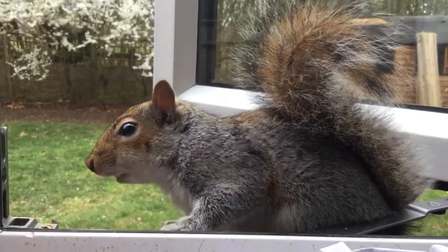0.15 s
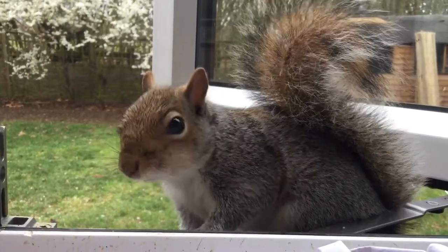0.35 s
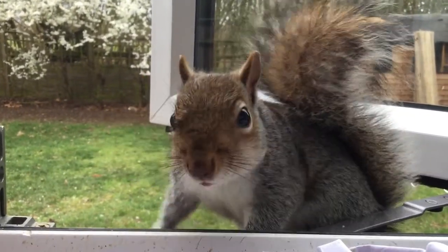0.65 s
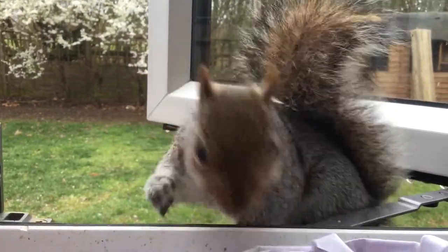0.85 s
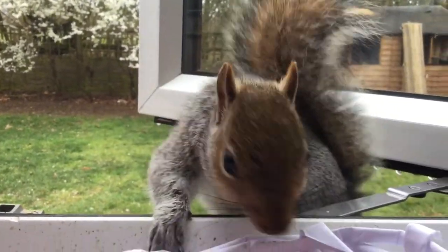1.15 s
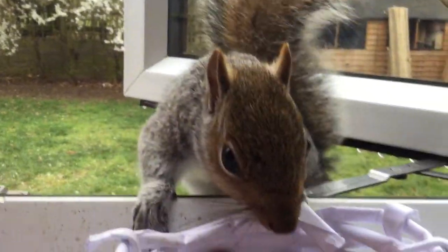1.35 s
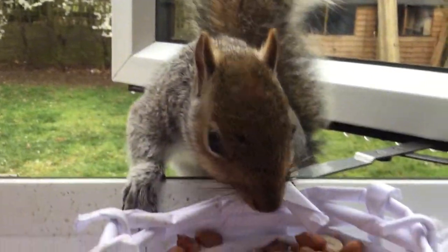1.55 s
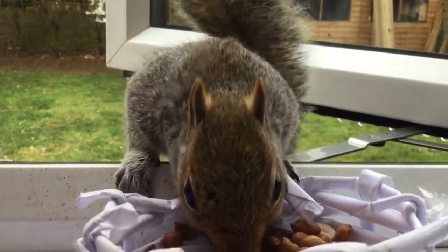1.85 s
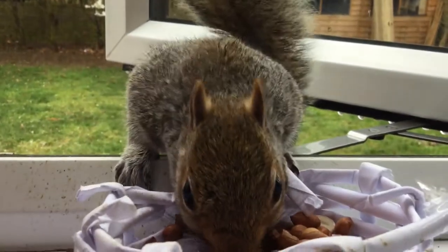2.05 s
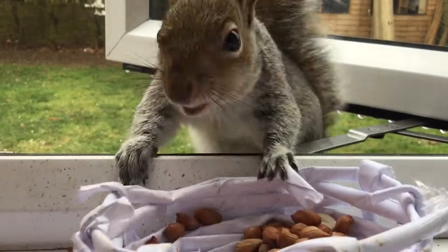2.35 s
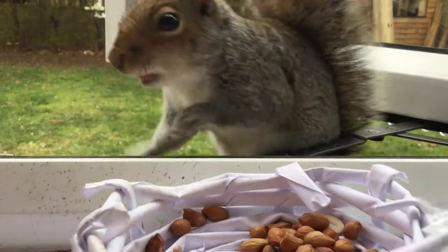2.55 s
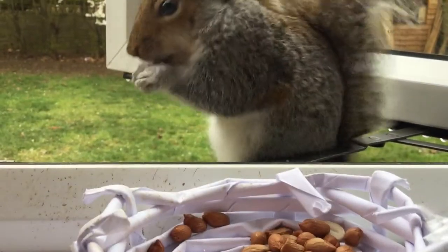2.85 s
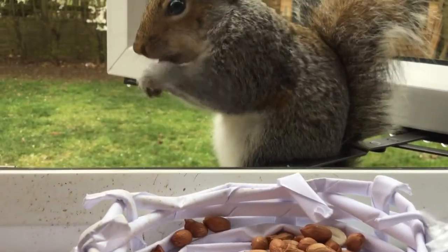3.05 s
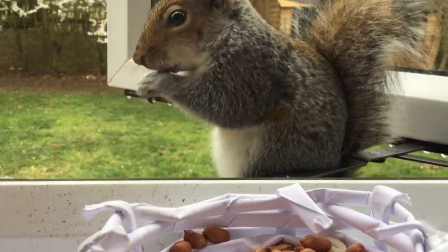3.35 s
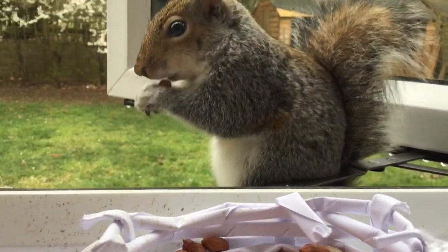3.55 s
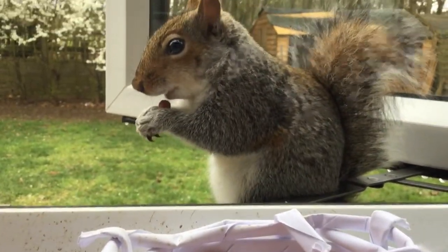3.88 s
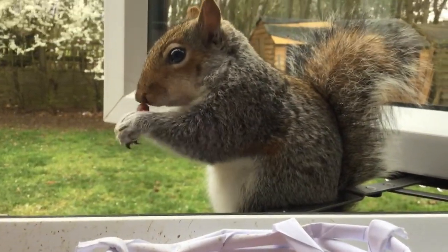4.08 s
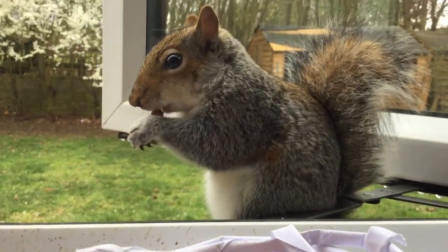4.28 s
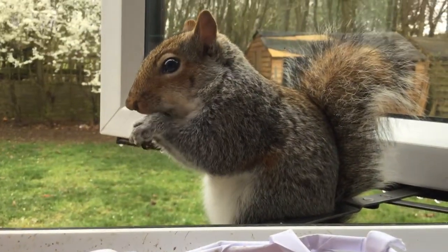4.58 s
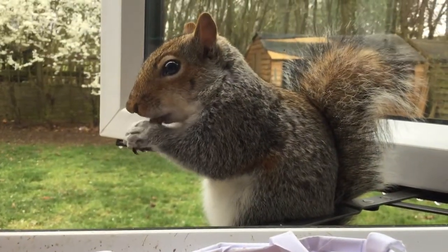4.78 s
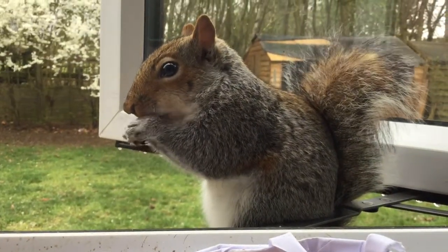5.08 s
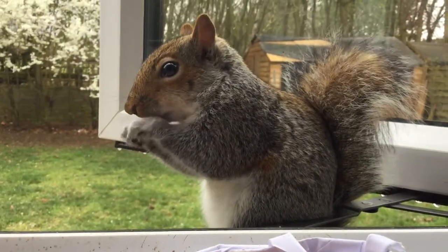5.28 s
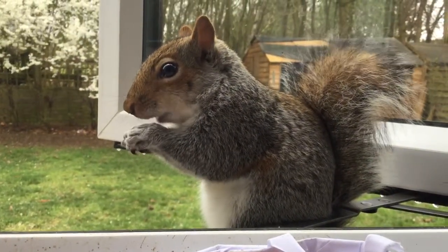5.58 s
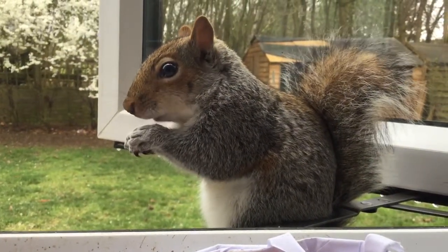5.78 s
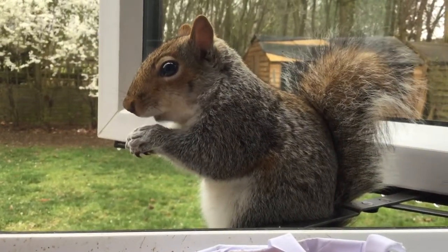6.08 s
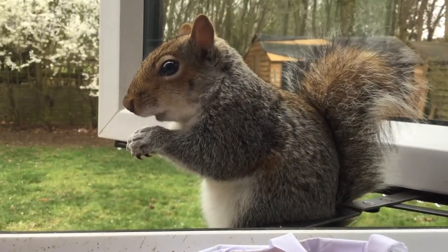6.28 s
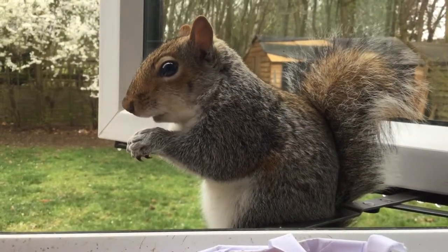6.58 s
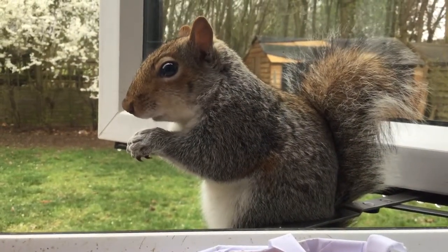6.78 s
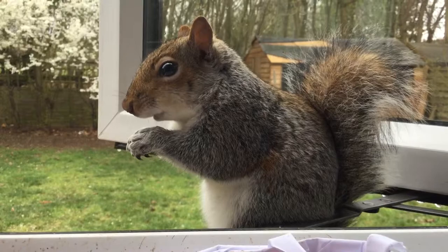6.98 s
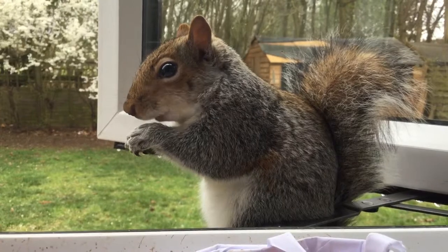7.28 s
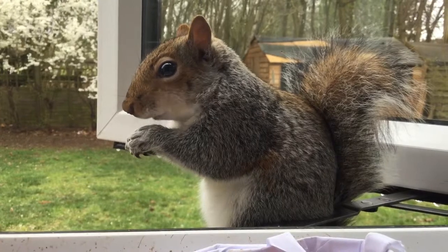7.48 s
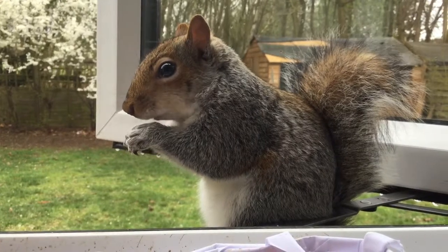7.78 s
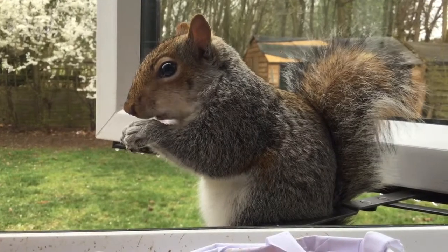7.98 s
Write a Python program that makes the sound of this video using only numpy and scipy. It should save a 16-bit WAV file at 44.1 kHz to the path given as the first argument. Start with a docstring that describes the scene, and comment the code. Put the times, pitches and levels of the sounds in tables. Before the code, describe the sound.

At an open window beside a quiet garden, dull knocks and a dry rattle of nuts come first, with a bird whistling outside. After a short lull and tiny metallic ticks, close crisp gnawing begins: irregular small snaps and scrapes, two bright hard cracks, then gentler nibbling. Faint traffic rumble runs throughout, a distant saw screeches briefly, and the bird sings again near the end.

```python
"""A squirrel gnaws a nut close to the microphone: its teeth scrape and snap, and twice the nut cracks sharply.
Before that its paws brush and knock on a window sill and a basket of nuts; claws tick lightly on metal.
Bites and touches are noise bursts and clouds of tiny slips that ring broad resonances.
Through the open window come distant traffic and hum (shaped noise, tones), a far whine like a saw,
birdsong (gliding tones) with a faint high haze, faint distant notes and a few puffs of wind on the microphone."""
import sys
import numpy as np
from scipy import signal
from scipy.fft import rfft, irfft
from scipy.io import wavfile
from scipy.ndimage import uniform_filter1d

SR = 44100
rng = np.random.default_rng(int(sys.argv[2]) if len(sys.argv) > 2 else 0)


def wav_out(sig):
    """Save sig, one row per channel (or a flat mono array), as 16-bit PCM at SR to the path in sys.argv[1]."""
    wavfile.write(sys.argv[1], SR, np.round(np.clip(np.atleast_2d(sig).T, -1, 1) * 32767).astype(np.int16))


N = 358971
TIME = np.arange(N) / SR
# Levels in the tables are in dB, relative within their layer: each layer is trimmed as it joins the mix.


def amp(db):
    """Decibels to gain."""
    return 10 ** (np.asarray(db) / 20)


def unit(x):
    """Scales to rms 1."""
    return x / np.sqrt(np.mean(x ** 2) + 1e-20)


def curves(rows):
    """Each column of a timed table, sample by sample."""
    s, *columns = np.transpose(rows)
    return [np.interp(TIME, s, c) for c in columns]


def add(mix, s, sound):
    """Mixes a sound in at time s."""
    part = mix[max(round(s * SR), 0):][:len(sound)]
    part += sound[:len(part)]


def coloured(x, points):
    """Gives x a spectrum drawn on a log-frequency axis."""
    hz, db = np.transpose(points)
    log_hz = np.log(np.fft.rfftfreq(len(x), 1 / SR) + 1)
    return irfft(rfft(x) * amp(np.interp(log_hz, np.log(hz), db)), len(x))


def band(x, lo_hz, hi_hz, order=3):
    """A broad causal resonance."""
    edges = np.clip([lo_hz, max(hi_hz, lo_hz * 1.05)], 10, SR * .49)
    return signal.sosfilt(signal.butter(order, edges, "bandpass", fs=SR, output="sos"), x)


def wander(size, hz):
    """Smooth chance of rms 1 that changes about hz times a second."""
    at = np.arange(size) * hz / SR
    knots = rng.standard_normal(size + 2)
    return unit(np.interp(at, np.arange(size + 2), knots))


def blur(size, hz):
    """Complex chance that spreads a carrier into a narrow band of noise."""
    return wander(size, hz) + 1j * wander(size, hz)


def patchy(x, depth_db, from_hz, size=5):
    """Lets patches of the spectrum above from_hz, size bins wide, swell and fade independently."""
    hz, _, z = signal.stft(x, SR, nperseg=2048, noverlap=1536)
    patches = rng.standard_normal(z.shape)
    for _ in range(2):
        across_pitch = uniform_filter1d(patches, size=size, axis=0)
        patches = uniform_filter1d(across_pitch, size=6, axis=1)
    depth = depth_db * np.clip(hz / from_hz - 1, 0, 1)[:, None]
    return signal.istft(z * amp(depth * unit(patches)), SR, nperseg=2048, noverlap=1536)[1][:N]


def echoes(x, t60, delay):
    """Diffuse reflections that die away by 60 dB in t60 seconds."""
    t = np.arange(SR) / SR
    tail = rng.standard_normal(SR) * amp(-60 * t / t60) * (t > delay)
    return signal.fftconvolve(x, tail / np.linalg.norm(tail))[:N]


def reflections(x, first_s, last_s, count):
    """Single echoes from fences, sheds and trees, the later ones weaker; together they make a note flutter."""
    delays = np.geomspace(first_s, last_s, count) * rng.uniform(.85, 1.15, count)
    gains = rng.choice([-1, 1], count) * delays ** -.35
    out = np.zeros(N)
    for delay, gain in zip(delays, gains / np.linalg.norm(gains)):
        add(out, delay, gain * x)
    return out


CONTACT_WIDTH_HZ, CONTACT_DB = 500, 3


def ring(drives, body, levels_db, size):
    """Rings a body with drives (resonances x events x samples); levels are rms over size samples.
    Every point of contact favours its own narrow mode within each broad resonance."""
    out = 0
    for drive, (lo_hz, hi_hz), db in zip(drives, body, levels_db):
        contact_hz = np.clip(rng.uniform(lo_hz, hi_hz, len(drive)), 500, SR * .45)
        contact = [signal.lfilter(*signal.iirpeak(hz, hz / CONTACT_WIDTH_HZ, fs=SR), d)
                   for hz, d in zip(contact_hz, drive)]
        mode = band(drive + amp(CONTACT_DB) * np.array(contact), lo_hz, hi_hz, order=4)
        to_level = np.sqrt(size / (mode ** 2).sum(-1, keepdims=True))
        out = out + mode * amp(db)[:, None] * to_level
    return out


def clicks(rows, body, sharp, after, after_s):
    """Each fracture or blow is a sudden burst, followed by a weaker shiver of what it strikes."""
    s, decay, *levels_db = np.transpose(rows)
    t, out = np.arange(1024) / SR, np.zeros(N)
    # the burst dies away in sharp times its listed decay
    burst = np.exp(-t / np.maximum(sharp * decay[:, None], 1e-4))
    envelope = burst + after * np.exp(-t / after_s)
    drives = rng.standard_normal((len(s), len(body), len(t))).swapaxes(0, 1) * envelope
    for start, sound in zip(s, ring(drives, body, levels_db, .004 * SR)):
        add(out, start, sound)
    return out


SLIP_REACH = .6  # chance that a slip excites a given resonance
STROKE_RISE = 2.11  # time scale of a stroke's rise over that of its fading


def scrapes(rows, body, slips_per_s, spread_db, smooth):
    """A stroke is a swelling, then fading cloud of tiny slips, each of its own size and colour."""
    s, length, *levels_db = np.transpose(rows)
    t, out = (np.arange(8192) - 4096) / SR, np.zeros(N)
    shape = (len(body), len(s), len(t))
    struck = (rng.random(shape[1:]) < slips_per_s / SR) & (rng.random(shape) < SLIP_REACH)
    slips = struck * amp(spread_db * np.minimum(rng.exponential(1, shape), 2.5))
    grit = smooth + signal.lfilter([1], [1, -np.exp(-1 / (.0005 * SR))], slips)  # slips fade over 0.5 ms
    u = t / np.maximum(0.3 * length[:, None], 1e-3)
    stroke = np.where(t < 0, np.exp(-(u / STROKE_RISE) ** 2), 1 / np.cosh(u))
    drives = rng.standard_normal(shape) * grit * stroke * signal.windows.tukey(len(t))
    for start, sound in zip(s + t[0], ring(drives, body, levels_db, length[:, None] * SR)):
        add(out, start, sound)
    return out


def voicing(colour, bright_db, boost_db):
    """Level of each resonance, stroke by stroke: brightness tilts them, and some stand out."""
    base_db, tilt, boosted = np.transpose(colour)
    return base_db + bright_db[:, None] * tilt + boost_db[:, None] * boosted


def splinters(blows, length, weaker_db, scatter_db, spread, count):
    """Weaker copies of each blow, scattered after it on the scale of its stroke."""
    rows = np.repeat(blows, count, axis=0)
    chance = rng.standard_normal(rows.shape)
    rows[:, 0] += spread * np.repeat(length, count) * abs(chance[:, 0])
    rows[:, 2:] += weaker_db + scatter_db * chance[:, 2:]
    return rows


# Spectrum of the distant traffic. Each row: frequency in Hz, relative density in dB.
TRAFFIC_COLOUR = [(20, -41.5), (40, -36), (60, -23), (90, -11), (125, -6), (160, 0.5), (200, 1), (295, 1),
                  (375, -4.5), (440, -7), (500, -5.5), (545, -7.5), (610, -5), (690, -8), (980, -12),
                  (1060, -14.5), (1270, -14.5), (1480, -20), (1750, -24), (1900, -32), (2100, -49),
                  (2500, -70), (4000, -75)]
# Its drift. Each row: time in seconds, level of the rumble in dB, level of the tyre roar in dB.
TRAFFIC_LEVEL = [(0, -56, -60), (2.6, -56.5, -59.5), (3.3, -57.5, -60.5), (4.6, -56, -60.5),
                 (6.4, -58, -61.5), (8.14, -56, -61.5)]


def traffic():
    """Low rumble and dull tyre roar, each drifting."""
    rumble_db, roar_db = curves(TRAFFIC_LEVEL)
    noise = coloured(rng.standard_normal(N), TRAFFIC_COLOUR)
    rumble = signal.sosfiltfilt(signal.butter(4, 500, fs=SR, output="sos"), noise)
    roar = patchy(noise - rumble, depth_db=6, from_hz=1120, size=2)
    low = unit(rumble) * amp(rumble_db + 1.2 * wander(N, 16))
    return low + unit(roar) * amp(roar_db)


# Spectrum of the echoing haze of the birdsong. Each row: frequency in Hz, relative density in dB.
HAZE_COLOUR = [(1500, -5), (2400, -5), (3200, -1), (4500, -4), (7000, -8), (12000, -12), (16000, -16)]
# Its drift. Each row: time in seconds, level in dB.
HAZE_LEVEL = [(0, -88), (.8, -85), (1.3, -76), (1.5, -91), (2.2, -83.5), (3.1, -91), (5.2, -87),
              (5.9, -89.5), (6.3, -91), (7.3, -88), (8.14, -90.5)]


def haze():
    """Faint high hiss, an echoing haze of the birdsong, made of noise whose spectrum is patchy."""
    hiss = patchy(coloured(rng.standard_normal(N), HAZE_COLOUR), depth_db=6.5, from_hz=1000)
    return unit(hiss) * amp(curves(HAZE_LEVEL)[0])


# Tones of distant machinery. Each row: frequency in Hz, level in dB.
HUM_TONES = [(157, -68), (297, -66.5), (495, -72), (615, -74.5), (985, -73.5)]
HUM_WAVER = .012  # rms share of the pitch


def hum():
    """Faint, unsteady tones of distant machinery within the traffic."""
    out = np.zeros(N)
    for hz, db in HUM_TONES:
        turns = np.cumsum(hz * (1 + HUM_WAVER * wander(N, 25))) / SR
        out += amp(db + 3 * wander(N, 6)) * np.sin(2 * np.pi * turns)
    return out


# Pitch of the far saw. Each row: time in seconds, fundamental in Hz.
SAW_PITCH = [(3.75, 451.5), (3.85, 449.5), (4.0, 443.5), (4.2, 431), (4.55, 434.5), (4.7, 426.5),
             (4.9, 430)]
# Level of its whine. Each row: time in seconds, level in dB.
SAW_LEVEL = [(3.74, -100), (3.77, -55), (3.87, -55.5), (3.92, -62), (4.3, -65), (4.62, -64), (4.8, -64.5),
             (4.92, -85), (5.1, -100)]
# Partials of its whine. Each row: multiple of the fundamental, level in dB.
SAW_PARTIALS = [(2.95, -4), (4, -12), (5, 0), (5.92, -8), (6.59, -9)]
# Its rasp in the cut. Each row: time in seconds, level in dB, centre in Hz.
SAW_RASP = [(3.745, -100, 2964), (3.765, -48.5, 2843), (3.875, -53.5, 2673), (3.905, -73, 2740),
            (4.25, -79.5, 2750), (4.55, -65.5, 2863), (4.75, -58, 2990), (5.05, -60, 3180),
            (5.3, -63, 3070), (5.4, -80, 3040), (5.7, -104, 2970)]
# Strands in which the blade rings. Each row: ratio to the rasp's centre, level in dB.
SAW_STRANDS = [(.77, -13), (.9, -6), (.955, -2), (1.0, -2), (1.065, -3), (1.15, -10), (1.42, -19),
               (1.6, -21)]
STRAND_WIDTH_HZ, STRAND_WAVER, STRAND_FLUTTER_DB = 130, .014, 4.5
RASP_WIDTH_HZ, RASP_BROAD_DB = 650, 3


def saw():
    """A whine that sags under load, blurred by the distance; in the cut the blade screeches
    in wavering strands over a rough rasp."""
    (hz,), (whine_db,), (rasp_db, rasp_hz) = curves(SAW_PITCH), curves(SAW_LEVEL), curves(SAW_RASP)
    turns = np.cumsum(hz * (1 + 0.003 * wander(N, 40) + 0.008 * wander(N, 400))) / SR
    whine = sum(amp(level + 4.4 * wander(N, 30)) * np.sin(2 * np.pi * k * turns)
                for k, level in SAW_PARTIALS)
    broad = (blur(N, RASP_WIDTH_HZ) * np.exp(2j * np.pi * np.cumsum(rasp_hz) / SR)).real
    rasp = amp(RASP_BROAD_DB) * band(broad, 2400, 3550)
    for ratio, level in SAW_STRANDS:
        strand_hz = ratio * rasp_hz * (1 + STRAND_WAVER * wander(N, 14))
        strand = np.exp(2j * np.pi * np.cumsum(strand_hz) / SR) * blur(N, STRAND_WIDTH_HZ)
        rasp = rasp + amp(level + STRAND_FLUTTER_DB * wander(N, 18)) * strand.real
    whine = amp(whine_db) * whine
    rasp = amp(rasp_db) * unit(rasp * amp(2.5 * wander(N, 120)))
    direct = amp(-1.5) * whine + amp(-2.0) * rasp
    return direct + echoes(direct, t60=0.091, delay=0.001) + amp(-14) * echoes(rasp, t60=0.44, delay=0.021)


# Faint distant notes and narrow noise bands, from birds, the saw or chewing.
# Each row: start in seconds, length in seconds, pitch in Hz, width of the blur in Hz, level in dB.
FAINT_NOTES = [(0.14, 0.27, 2390, 193, -70.5), (0.326, 0.17, 2300, 262, -78), (0.166, 0.21, 3220, 505, -81),
               (0.362, 0.15, 3360, 300, -72), (0.899, 0.034, 3250, 506, -74), (0.968, .16, 4180, 254, -82),
               (1.162, 0.021, 3650, 300, -66), (1.19, 0.19, 3130, 403, -68), (1.204, 0.05, 3900, 350, -72),
               (2.134, 0.29, 4400, 353, -86), (2.359, 0.29, 4300, 526, -78), (2.598, 0.44, 4330, 154, -87),
               (2.695, 0.1, 2220, 194, -79), (3.965, 0.039, 2900, 120, -74), (4.737, 0.097, 1353, 203, -67),
               (4.931, 0.12, 5270, 300, -91), (4.978, 0.15, 3270, 233, -68),
               (5.412, 0.13, 2600, 604, -80.5), (5.546, 0.53, 2810, 442, -90),
               (6.548, 0.33, 2980, 711, -87.5), (7.19, 0.39, 6970, 690, -85.5), (7.249, .4, 2900, 603, -99),
               (7.659, 0.14, 5200, 206, -86), (7.846, 0.11, 3130, 600, -83),
               (8.077, 0.061, 3210, 400, -74.5)]
FLUTTER_HZ, FLUTTER_DB = 45, 4.5


def faint_notes():
    """Faint notes and noises from birds, the saw or chewing: narrow bands that flutter and break up."""
    out = np.zeros(N)
    for s, length, hz, width, db in FAINT_NOTES:
        size = max(int(length * SR), 64)
        fluttering = blur(size, width) * amp(FLUTTER_DB * wander(size, FLUTTER_HZ))
        note = (fluttering * np.exp(2j * np.pi * hz * np.arange(size) / SR)).real
        add(out, s, amp(db) * unit(note * signal.windows.tukey(size, .5)))
    return out


# The songbird's syllables, and the echoing tail of a whistle. Each: length in seconds,
# start and end pitch as ratios of the middle, buzz in Hz (twice the rms of its random shake in pitch).
RISE = (.045, .86, 1.1, 120)
SLUR = (.08, 1.12, .975, 90)
TAIL = (.11, 1, 1, 110)
BUZZ = (.065, 1.06, .93, 520)
SWEEP = (0.093, 1, 0.63, 1600)
DROP = (.03, 1.2, .8, 200)
CHIP = (.055, 1.05, .96, 260)
# When it sings them. Each row: start in seconds, middle pitch in Hz, level in dB.
RISES = [(.128, 3620, -60.5), (.196, 4580, -63.5), (.97, 3530, -73), (4.816, 4190, -72.5),
         (5.35, 5610, -73), (5.492, 3210, -71), (5.958, 3490, -72), (6.04, 3350, -82), (6.421, 3570, -64),
         (6.49, 4660, -69), (7.158, 3925, -61.5), (7.405, 3820, -65.5)]
SWEEPS = [(1.555, 6850, -66), (7.745, 7230, -71)]
DROPS = [(7.812, 5170, -65)]
CHIPS = [(1.43, 2790, -74), (1.615, 5200, -66), (1.781, 4390, -62), (1.94, 6100, -63.5), (2.385, 5000, -87),
         (3.77, 5280, -75), (4.285, 5080, -80.5), (4.916, 4350, -76.5), (7.839, 3340, -74.5),
         (8.015, 6800, -71.5)]
# A slurred whistle, then its steady echoing tail.
# Each row: start in seconds, middle pitch of the whistle in Hz, its level in dB.
WHISTLES = [(1.055, 5060, -58.5), (1.29, 4995, -58.5), (7.246, 5074, -54.5), (7.487, 4996, -59)]
TAIL_AFTER_S, TAIL_RATIO, TAIL_DB = .055, .975, -7  # tail relative to its whistle
# Five even buzzes lead up to the whistles. Each row: start in seconds, level in dB.
TRILLS = [(0.467, -76), (6.671, -73)]
TRILL_HZ, TRILL_STEP_S = 5400, .095


def trill(s, db, count):
    """Evenly spaced buzzes on one middle pitch."""
    return [(s + k * TRILL_STEP_S, TRILL_HZ, db) for k in range(count)]


def syllables():
    """Every note of the song, and every whistle's tail, with its shape."""
    tails = [(s + TAIL_AFTER_S, hz * TAIL_RATIO, db + TAIL_DB) for s, hz, db in WHISTLES]
    buzzes = [note for s, db in TRILLS for note in trill(s, db, count=5)]
    kinds = [(RISES, RISE), (WHISTLES, SLUR), (tails, TAIL), (buzzes, BUZZ),
             (SWEEPS, SWEEP), (DROPS, DROP), (CHIPS, CHIP)]
    return [(*note, *shape) for notes, shape in kinds for note in notes]


# pulsing of a buzzy syllable: mean rate, depth, and the buzz from which it is fully deep
PULSE_HZ, PULSE_DB, FULL_BUZZ_HZ = 62, 8, 520


def songbird():
    """Whistles glide slightly faster at first; buzzy syllables shake in pitch and pulse in level."""
    out = np.zeros(N)
    for s, middle_hz, db, length, start, end, buzz_hz in syllables():
        u = np.linspace(0, 1, max(int(length * SR), 64))
        size = len(u)
        glide = middle_hz * np.polyval(np.polyfit([0, .5, 1], [start, 1, end], 2), u ** 0.91)
        pulse_turns = np.cumsum(PULSE_HZ * (1 + .2 * wander(size, 60))) / SR
        pulse = np.sin(2 * np.pi * pulse_turns) * min(buzz_hz / FULL_BUZZ_HZ, 1)
        hz = glide + .5 * buzz_hz * (wander(size, 700) + pulse)
        swell = signal.windows.tukey(size, .6) * amp(4 * wander(size, 170) + PULSE_DB * pulse)
        add(out, s, amp(db) * unit(swell * np.sin(2 * np.pi * np.cumsum(hz) / SR)))
    return out


# Wind on the microphone. Each row: centre in seconds, length in seconds, level in dB.
PUFFS = [(3.57, 0.02, -53), (5.45, 0.072, -57), (5.512, 0.042, -50), (5.574, 0.017, -49), (6.0, 0.088, -63),
         (6.171, 0.045, -58), (6.229, 0.017, -37), (6.252, 0.025, -44), (6.575, 0.045, -52.5),
         (6.649, 0.044, -54), (7.63, 0.0098, -40.5), (7.7, 0.048, -59)]
# Colour of an eddy that lasts PUFF_SPAN_S. Each row: frequency in Hz, level in dB.
PUFF_COLOUR = [(20, -66), (50, -22), (90, -5.5), (160, 4.5), (240, -6), (350, -18), (700, -56)]
PUFF_SPAN_S, PUFF_DEEPENING = .029, .21  # the second is the power by which length lowers the colour


def wind():
    """Short eddies thump the microphone; the longer the eddy, the deeper it sounds."""
    t, out = (np.arange(16384) - 8192) / SR, np.zeros(N)
    for s, length, db in PUFFS:
        colour = [(hz * (PUFF_SPAN_S / length) ** PUFF_DEEPENING, level) for hz, level in PUFF_COLOUR]
        puff = coloured(rng.standard_normal(len(t)) * np.exp(-2 * (t / length) ** 2), colour)
        add(out, s + t[0], amp(db) * puff * np.sqrt(length * SR / np.sum(puff ** 2)))
    return out


# Broad resonances of the sill, low to top. Each row: lower edge in Hz, upper edge in Hz.
SILL = [(1150, 2180), (2300, 4240), (3400, 7050), (6900, 10500), (11000, 15050)]
# Their voicing. Each row: level in dB, share of the brightness, share of the weight.
SILL_COLOUR = [(-4.5, -0.12, 0.98), (-2, -0.65, 1), (-4, -0.37, 0), (-7, 0.29, 0.11), (-4, 0.92, 0.19)]
# Brushing knocks of paws on sill and basket, and (the last two rows) two dull bites.
# Each row: knock in seconds, stroke length in seconds, knock level in dB, brushing level in dB,
# brightness in dB, weight in dB in the low resonances.
TOUCHES = [(0.106, 0.022, -51, -61, 10, -29), (0.286, .01, -60, -67, 9, -13),
           (0.303, 0.033, -41.5, -63.5, 3.5, -0.5), (0.437, 0.028, -74, -71, 5.5, 5),
           (0.599, 0.037, -46, -57, -3, -7), (0.7, 0.021, -69, -77, 10, -20),
           (0.803, 0.018, -58, -64, 6, 9), (0.979, 0.016, -48, -59, 13, 2),
           (1.001, 0.021, -69, -65.5, -11, -21), (1.161, 0.046, -50.5, -69, 5, -0.5),
           (1.211, 0.037, -64, -79.5, 4.5, 22.5), (1.265, 0.0054, -32, -49, -8, -7.5),
           (1.2763, 0.054, -39, -60, -4, -3.5), (1.33, 0.015, -65, -69.5, 12, 8.5),
           (1.601, 0.014, -46.5, -52, -6.5, -19), (1.6572, 0.011, -55, -69, -11, -6),
           (1.6607, 0.023, -47, -47, -2, -10), (1.678, 0.012, -60, -65, 4, 16),
           (1.68, 0.026, -51.5, -76, 5, 8.5), (1.688, 0.011, -53, -51, 3, -2),
           (1.698, 0.016, -38, -54, -7, -21), (1.7, 0.011, -77, -50, -3, -2),
           (1.718, 0.027, -52, -60, -4, 0), (1.732, 0.012, -59, -78, -3, 11),
           (1.7334, .008, -55, -76, 2, 4), (1.767, 0.017, -73, -78, 8, 8),
           (1.814, 0.015, -51, -75, -14, -5), (1.818, .008, -57, -78, 2, -6),
           (1.8445, 0.034, -47, -69, 4.5, 6), (1.846, 0.017, -50.5, -66, 1.5, 8),
           (1.866, .01, -63, -74, -6, 3), (1.885, 0.044, -59, -69.5, -5.5, -3),
           (2.0006, 0.028, -53, -67.5, -8, -2), (2.0086, 0.034, -49.5, -66, -8.5, 8.5),
           (2.016, 0.034, -64, -58, -9.5, 0), (2.029, 0.012, -61.5, -89, -15.5, 0),
           (2.1015, 0.04, -48.5, -70, -8.5, 9), (2.116, 0.017, -55.5, -80, -4, 11.5),
           (2.143, 0.019, -59.5, -67, 2, -6), (2.166, 0.028, -69, -67, -7, -20),
           (2.19, 0.039, -77, -72.5, 7, 5.5), (2.241, 0.018, -73, -78, 26, -14),
           (2.302, 0.017, -70, -63.5, -6, -8.5), (2.471, 0.029, -60, -62, -1, -10),
           (2.482, 0.042, -52, -55.5, -5, -7), (2.549, 0.042, -47.5, -62, 0, -7),
           (2.578, 0.0086, -67, -60.5, 1, 5), (2.635, 0.025, -48.5, -69, 7, -21),
           (4.046, 0.0091, -70, -78.5, -4, 20), (4.35, 0.016, -76, -70, -1, 11.5)]
# decay of a light claw tap (weight 0 dB) and of nut on nut (8 dB), before the sharpening in clicks
KNOCK_DECAY_S, HEAVY_DECAY_S = .0035, .0014
BRUSH_LAG = 0.18  # the brushing peaks this share of its length after the knock


def touches():
    """Each touch, or dull bite, is a brushing stroke with one knock and a little rattle;
    weighty knocks are the shortest."""
    s, length, knock_db, brush_db, bright_db, weight_db = np.transpose(TOUCHES)
    colour = voicing(SILL_COLOUR, bright_db, weight_db)
    decay = np.interp(weight_db, [0, 8], [KNOCK_DECAY_S, HEAVY_DECAY_S])
    knocks = np.column_stack([s, decay, knock_db[:, None] + colour])
    rattle = splinters(knocks, length, weaker_db=-18, scatter_db=4, spread=.5, count=2)
    brushes = np.column_stack([s + BRUSH_LAG * length, length, brush_db[:, None] + colour])
    knocking = clicks(np.vstack([knocks, rattle]), SILL, sharp=.7, after=.12, after_s=.003)
    brushing = scrapes(brushes, SILL, slips_per_s=330, spread_db=4.5, smooth=.22)
    return amp(-4.5) * knocking + brushing


# Claws tick lightly on metal as the squirrel shifts. Each row: start in seconds, level in dB.
TICKS = [(2.9475, -56), (2.968, -66), (2.9767, -68), (2.985, -72), (2.993, -62), (3.02, -64), (3.025, -72),
         (3.0306, -62), (3.039, -65), (3.2854, -61), (3.296, -59)]
# The two resonances of those ticks. Each row: lower edge in Hz, upper edge in Hz.
METAL = [(5800, 7400), (8700, 11200)]
TICK_DECAY_S, TICK_UPPER_DB = 0.00066, -11  # decay before the sharpening in clicks


def claws():
    """The claws tick lightly on metal as the squirrel shifts: short bursts in two resonances."""
    rows = [(s, TICK_DECAY_S, db, db + TICK_UPPER_DB) for s, db in TICKS]
    return amp(1.5) * clicks(rows, METAL, sharp=0.61, after=0.079, after_s=0.012)


# Narrow resonances of the nut shell. Each row: frequency in Hz, width in Hz, gain in dB.
SHELL = [(4100, 300, -6), (8970, 360, 5.5), (11900, 400, 3.5), (13500, 600, 4.5), (14180, 600, -2)]


def shell(x):
    """The nut shell lends every bite the same few peaks."""
    peaks = sum(amp(db) * signal.lfilter(*signal.iirpeak(hz, hz / width, fs=SR), x) for hz, width, db in SHELL)
    return amp(-4.5) * (x + peaks)


# Broad resonances of the nut, low to top. Each row: lower edge in Hz, upper edge in Hz.
NUT = [(2050, 5400), (3450, 5100), (4800, 7340), (7400, 10900), (11000, 15400)]
# Their voicing. Each row: level in dB, share of the brightness, share of the ring.
NUT_COLOUR = [(-7, -1.1, 0), (-3.5, -1.7, 0), (-1.5, -0.65, 0.18), (-2, 0.27, 0.99), (-1.5, 1, 0)]
# The lowest resonance, which the first bites barely sound. Each row: time in seconds, level in dB.
NUT_BODY = [(3.6, -22), (4.1, 0), (4.66, -6), (5.34, -6), (5.45, 0), (8.1, 0)]
# Each bite of the teeth is a snap amid a swelling, fading scrape.
# Each row: snap in seconds, stroke length in seconds, snap level in dB, scraping level in dB,
# brightness in dB, ring of the shell near 9 kHz in dB.
BITES = [(2.839, 0.012, -82, -82, 15, 0), (2.874, 0.023, -52, -63, 0.5, 4),
         (2.875, 0.0052, -62, -83, 5, 23), (3.301, 0.039, -64, -84, -2, 2), (3.303, .008, -67, -80, 0, -2),
         (3.3145, .008, -66, -80, 1, 1), (3.3207, .012, -59, -72, 0, 3), (3.339, .008, -45, -64, -0.5, 4.5),
         (3.3418, 0.016, -47, -64, 3, 3), (3.346, 0.018, -51, -61, -2, 2), (3.367, 0.011, -74, -72, -4, 5),
         (3.3836, 0.012, -57, -66, -3, 1), (3.403, .01, -70, -82, 2, 3),
         (3.414, 0.021, -50, -67, -5.5, -2.5), (3.429, 0.014, -60, -69, -3, -5),
         (3.521, .01, -73, -94, 16.5, -20), (3.587, 0.021, -44.5, -64.5, -3.5, -2),
         (3.621, .012, -69, -71, 8, -10), (3.779, 0.029, -72.5, -87.5, 25.5, 0),
         (3.8825, 0.021, -62, -67, 1, -5), (3.994, .015, -82, -86, 13, -20),
         (4.032, 0.027, -69, -68, 5, -16), (4.0929, .015, -76, -93, 12, -25),
         (4.1985, 0.024, -56.5, -63, -6.5, -11), (4.205, 0.0087, -65, -60, 2, -5),
         (4.341, 0.022, -65, -63, 4, -10), (4.4035, 0.016, -74, -86, 14, -12),
         (4.4989, 0.023, -47, -62, -1.5, -12), (4.626, 0.013, -76, -78, 1, 7),
         (4.6433, 0.0066, -56, -69, 0, 7), (4.648, 0.006, -46.5, -68, 6, 9), (4.652, .006, -53, -72, 1, 5),
         (4.6613, 0.0085, -25, -67, 3, 5.5), (4.889, 0.018, -66, -82, 10.5, 1),
         (4.8959, 0.029, -56.5, -78, 16.5, 14), (4.913, .012, -69, -88, 8.5, 7),
         (5.002, 0.018, -77, -73, 0, 9), (5.013, 0.011, -67, -80, -2, 11), (5.018, 0.012, -51, -70, 9, 6),
         (5.0235, .008, -55, -76, 11, 8), (5.0267, 0.014, -51, -73, 3, 9),
         (5.0286, 0.0087, -44.5, -76, 13, 9.5), (5.0355, 0.011, -39.5, -69, 13, -2),
         (5.0601, 0.023, -34.5, -62, 8, 5), (5.176, 0.054, -74, -74, 6.5, -6),
         (5.289, 0.024, -68, -63, 3.5, 2), (5.315, 0.028, -62, -67.5, 3, -2),
         (5.3386, 0.014, -49.5, -69, -1.5, 5), (5.361, 0.04, -80, -71, -1.5, 4),
         (5.415, 0.035, -74, -71.5, 4, -1), (5.452, 0.018, -46.5, -63, 5.5, 4.5),
         (5.456, 0.023, -45, -61, -2, -5), (5.635, 0.023, -72, -66, 3.5, 7),
         (5.783, .008, -63, -73, -1, -6.5), (5.795, 0.01, -52, -61, -3.5, -14),
         (5.803, 0.0074, -59, -76, 1, -3), (5.821, 0.043, -55, -68.5, -3, 1),
         (5.823, 0.022, -49.5, -69, -3.5, -2), (5.864, 0.014, -68, -85, -3, 9),
         (5.913, 0.024, -64, -70.5, -4, 8.5), (6.08, 0.021, -67, -67, 5, -1.5),
         (6.14, 0.024, -86, -100, 4, 28), (6.151, 0.035, -78.5, -100, -1, 24),
         (6.2315, 0.022, -54.5, -63, -1.5, -6.5), (6.331, 0.038, -88, -88, 7, 6),
         (6.461, 0.023, -93, -101, 2, 22.5), (6.556, 0.02, -52.5, -65, -1, -3.5),
         (6.7144, 0.034, -58, -71.5, -5, -2), (6.7285, 0.015, -66, -65.5, -0.5, 9.5),
         (6.7755, 0.052, -64.5, -82, 11, -5), (6.905, 0.018, -76, -78.5, -1, -12),
         (7.05, 0.02, -75, -72, -3, 4), (7.3, 0.02, -81.5, -99, 0, 26), (7.41, 0.018, -54, -58.5, 0, -4.5),
         (7.575, 0.014, -64, -56.5, -3, -4), (7.58, 0.017, -56.5, -77, 0, 9.5),
         (7.622, 0.013, -64, -78, 6, -10), (7.753, 0.02, -60.5, -67, 7.5, -4),
         (7.903, 0.013, -69, -61, 0, -14), (8.061, 0.015, -54, -58, -0.5, -0.5)]
# decay of a light snap (-60 dB) and of a hard crack (-30 dB), before the sharpening in clicks
SNAP_DECAY_S, CRACK_DECAY_S = 0.0017, 0.00037


def teeth():
    """Each bite is a snap amid a swelling, fading scrape; a weaker snap follows.
    The harder the snap, the shorter it is."""
    s, length, snap_db, scrape_db, bright_db, ring_db = np.transpose(BITES)
    colour = voicing(NUT_COLOUR, bright_db, ring_db)
    colour[:, 0] += np.interp(s, *np.transpose(NUT_BODY))
    decay = np.interp(snap_db, [-60, -30], [SNAP_DECAY_S, CRACK_DECAY_S])
    snaps = np.column_stack([s, decay, snap_db[:, None] + colour])
    weaker_snaps = splinters(snaps, length, weaker_db=-19, scatter_db=3, spread=.35, count=1)
    # the scrape peaks just after the snap
    gnaws = np.column_stack([s + 0.0012, length, scrape_db[:, None] + colour])
    snapping = clicks(np.vstack([snaps, weaker_snaps]), NUT, sharp=.45, after=.05, after_s=.003)
    gnawing = scrapes(gnaws, NUT, slips_per_s=380, spread_db=4.5, smooth=.2)
    return amp(-2.65) * snapping + amp(0.8) * gnawing


def scene():
    """The squirrel close by with a little of the room behind it, the garden further off."""
    near = touches() + claws() + shell(teeth())
    bird = songbird()
    # walls and fences blur the song at once; the garden adds a longer tail
    song = amp(-5) * bird + amp(-8) * reflections(bird, first_s=.003, last_s=.075, count=9)
    song += amp(-13) * echoes(bird, t60=.42, delay=.008)
    outside = song + haze() + amp(-10.0) * saw() + traffic() + hum()
    # the window recess answers at once; the room rings on more faintly
    recess = amp(-21.5) * echoes(near, t60=0.045, delay=0.001)
    room = recess + amp(-25) * echoes(near, t60=0.24, delay=0.006)
    return (near + room + outside + faint_notes() + amp(2.0) * wind())[None]


EDGE_HZ = 16700


def record(dry):
    """The recorder's band limit: a steep low-pass at EDGE_HZ."""
    return signal.oaconvolve(dry, signal.firwin(401, EDGE_HZ, window=("kaiser", 9), fs=SR)[None], "same")


dry = scene()
out = record(dry)
wav_out(out)
```